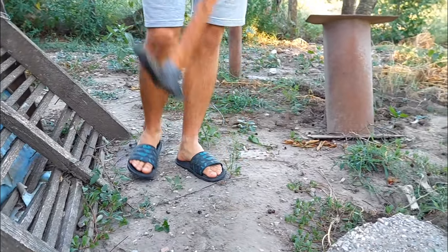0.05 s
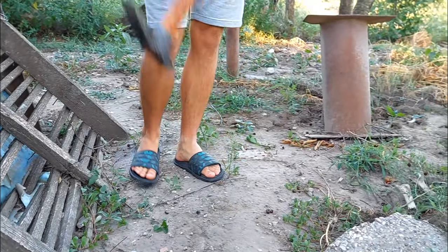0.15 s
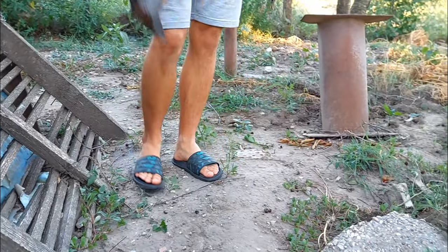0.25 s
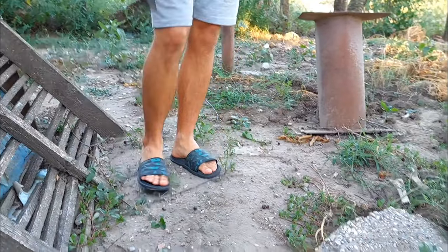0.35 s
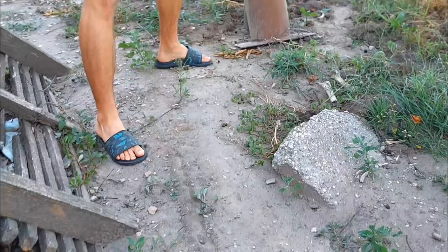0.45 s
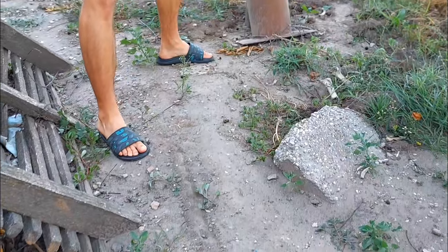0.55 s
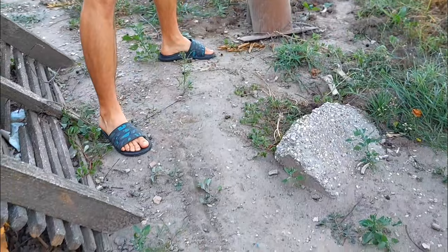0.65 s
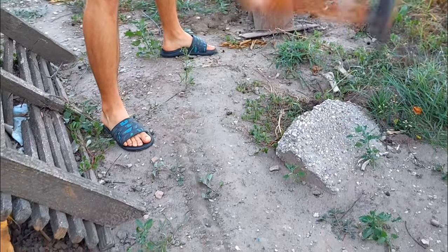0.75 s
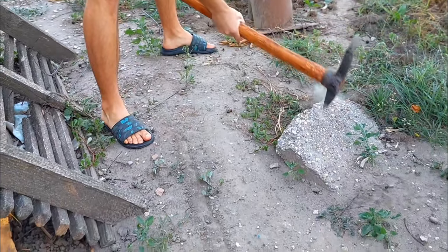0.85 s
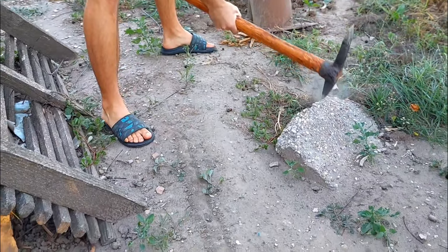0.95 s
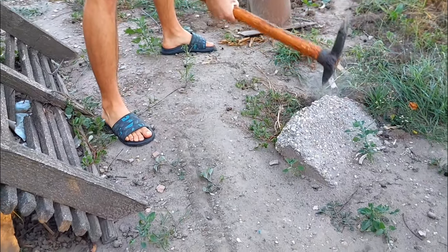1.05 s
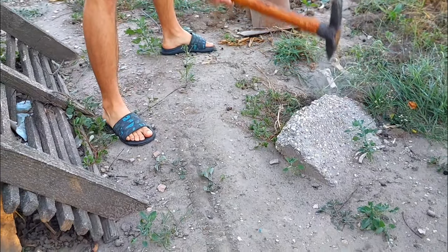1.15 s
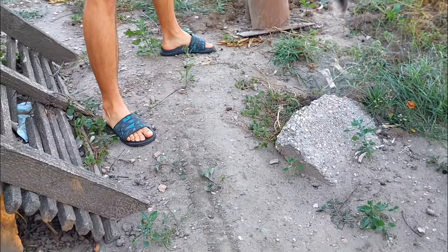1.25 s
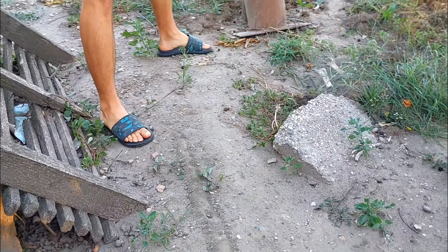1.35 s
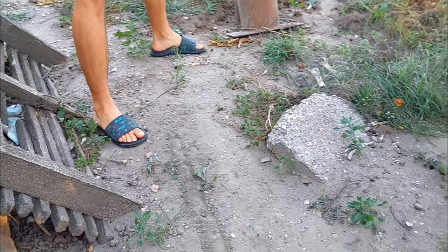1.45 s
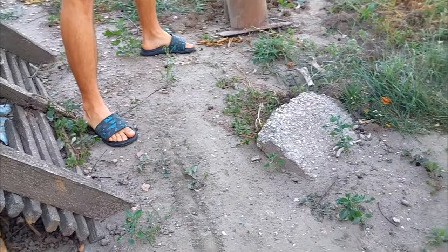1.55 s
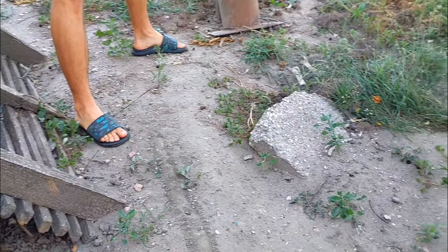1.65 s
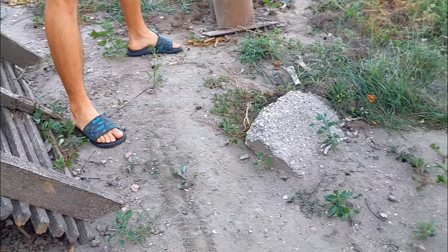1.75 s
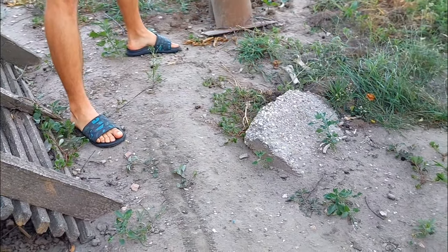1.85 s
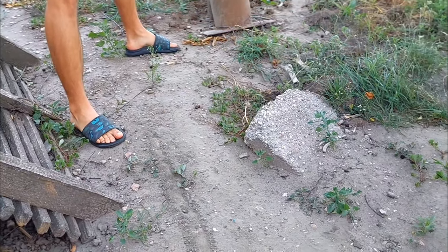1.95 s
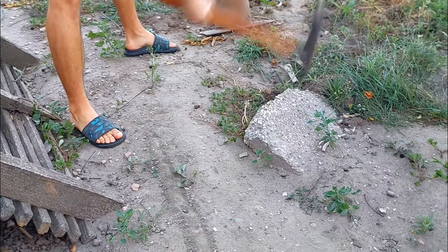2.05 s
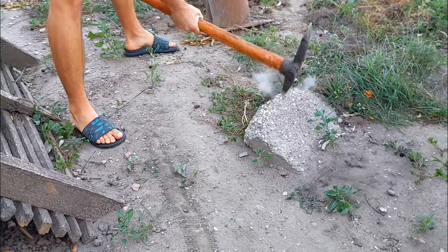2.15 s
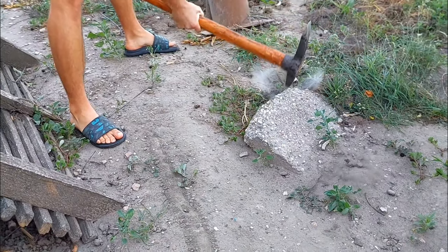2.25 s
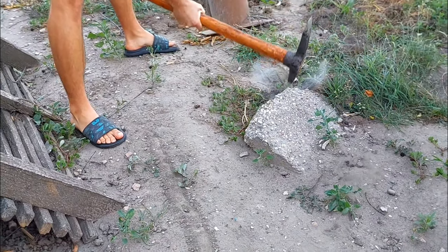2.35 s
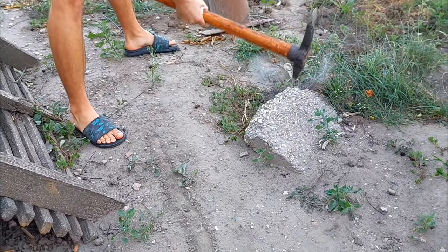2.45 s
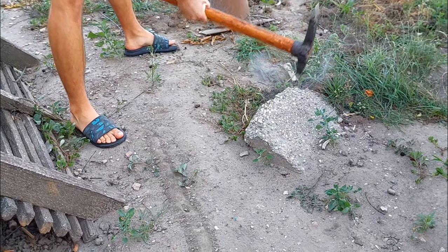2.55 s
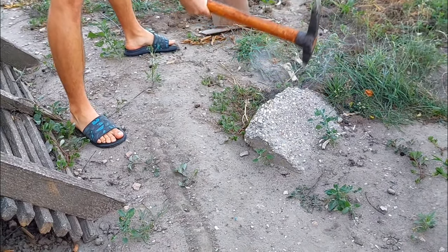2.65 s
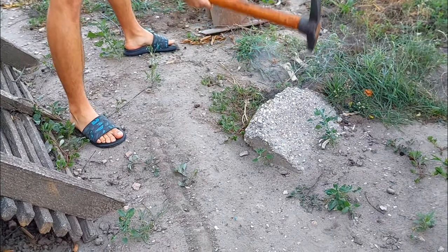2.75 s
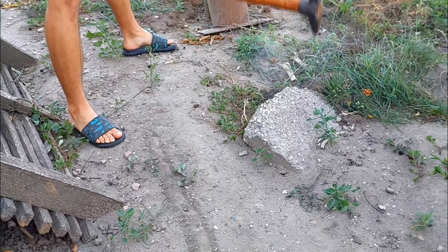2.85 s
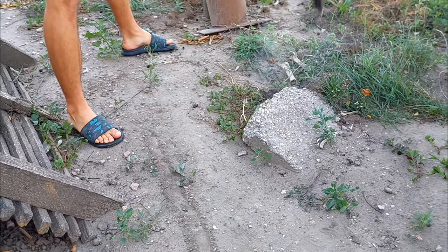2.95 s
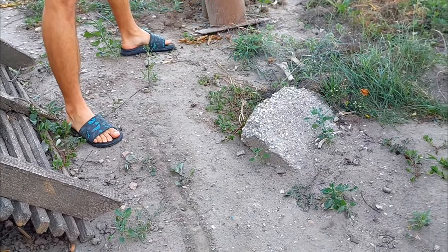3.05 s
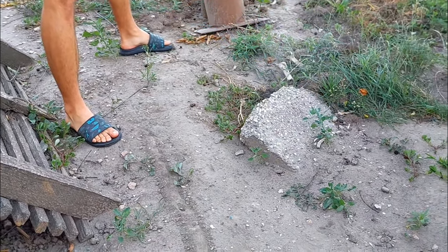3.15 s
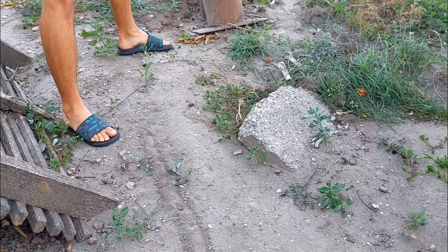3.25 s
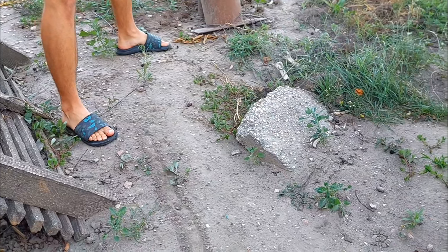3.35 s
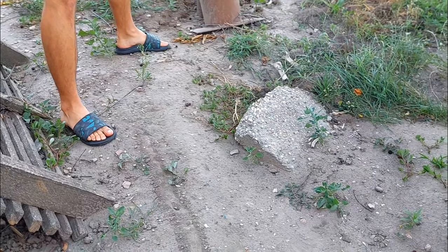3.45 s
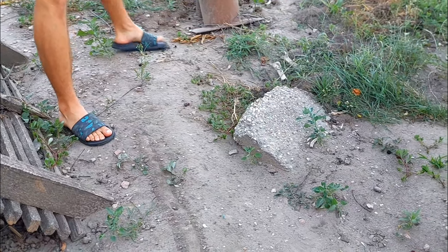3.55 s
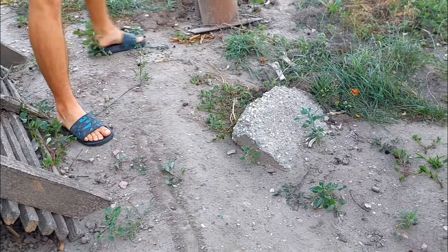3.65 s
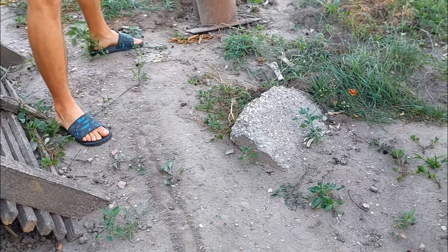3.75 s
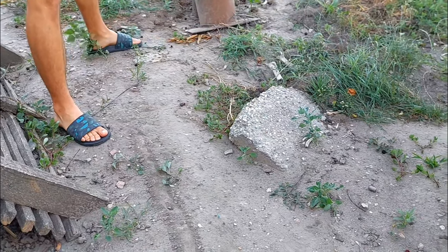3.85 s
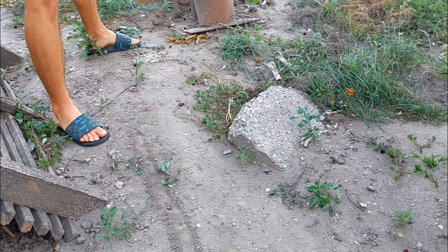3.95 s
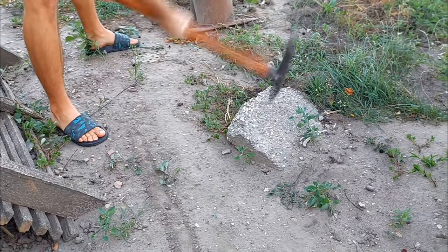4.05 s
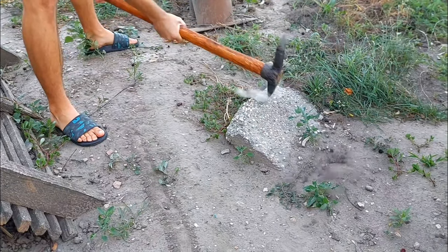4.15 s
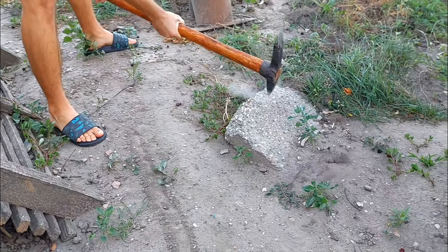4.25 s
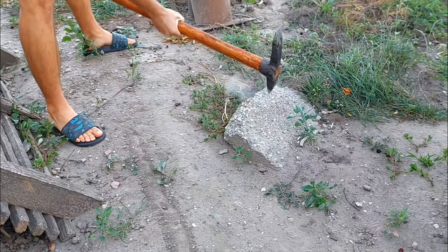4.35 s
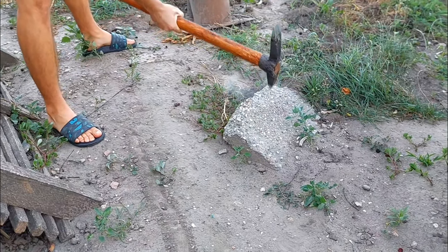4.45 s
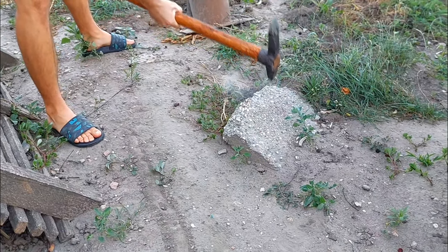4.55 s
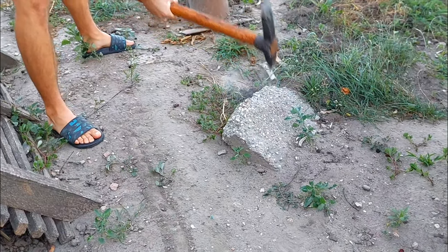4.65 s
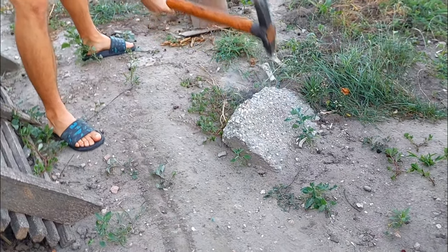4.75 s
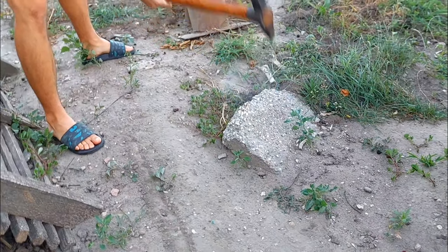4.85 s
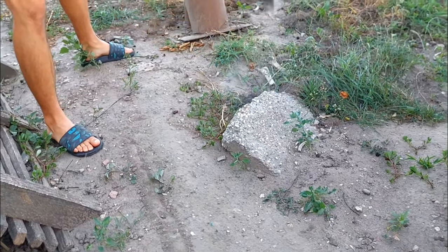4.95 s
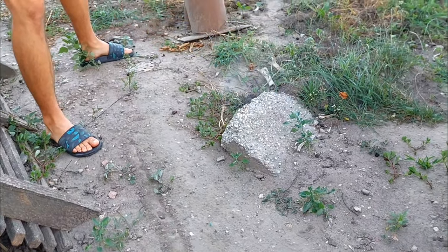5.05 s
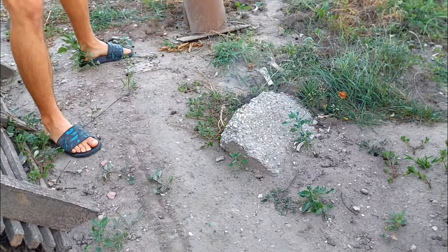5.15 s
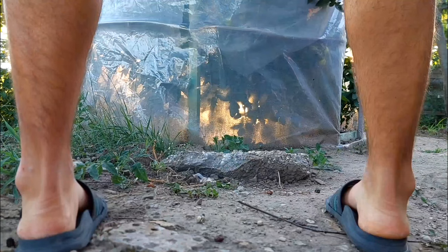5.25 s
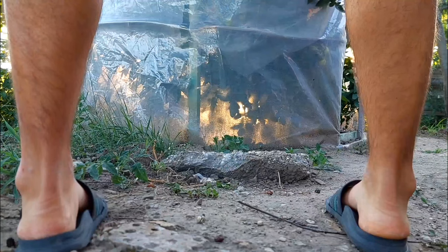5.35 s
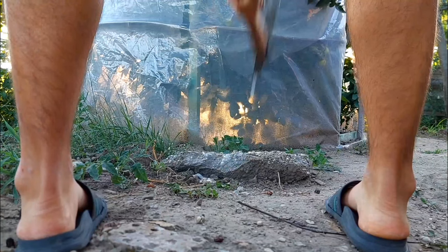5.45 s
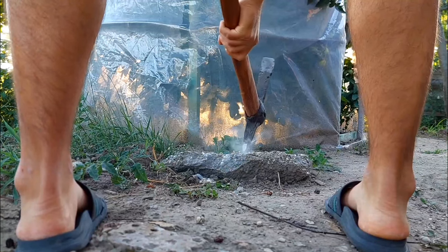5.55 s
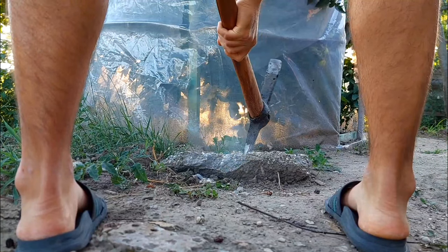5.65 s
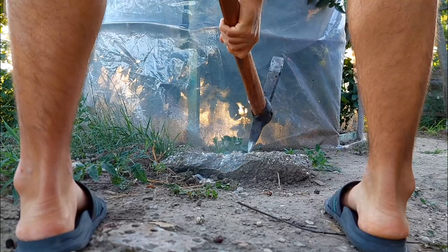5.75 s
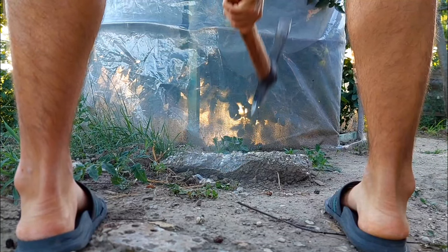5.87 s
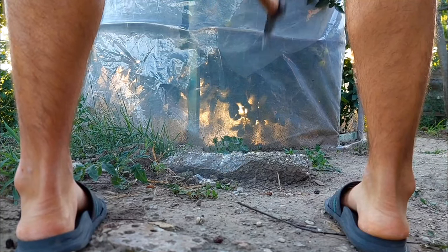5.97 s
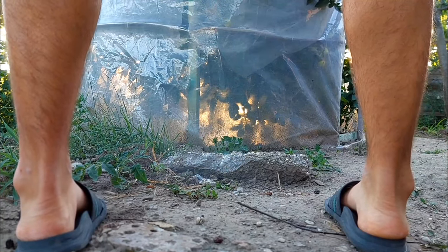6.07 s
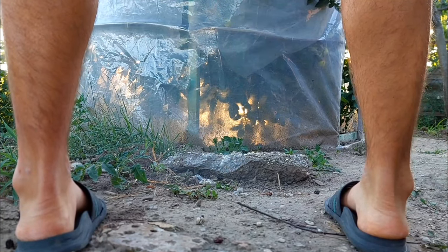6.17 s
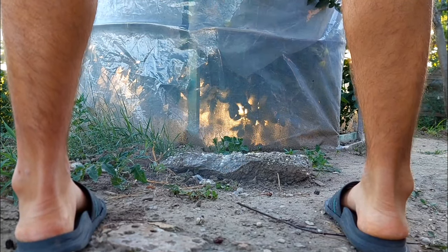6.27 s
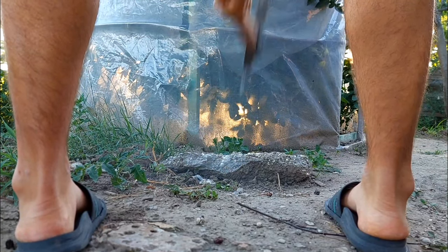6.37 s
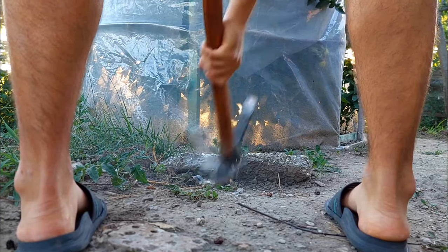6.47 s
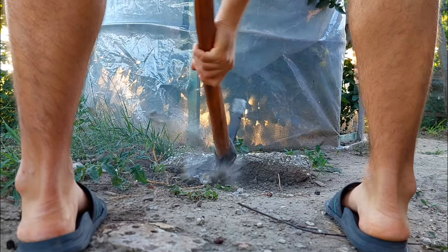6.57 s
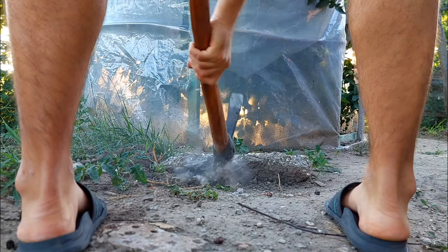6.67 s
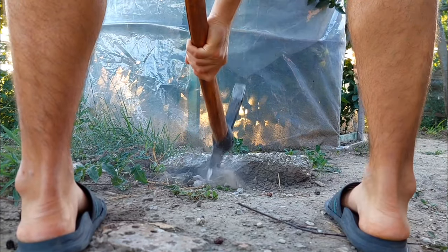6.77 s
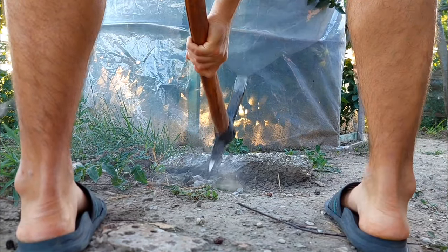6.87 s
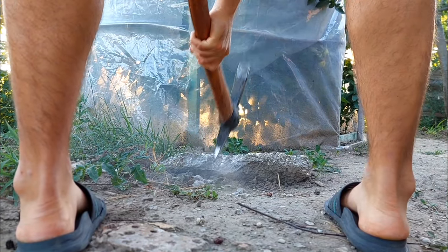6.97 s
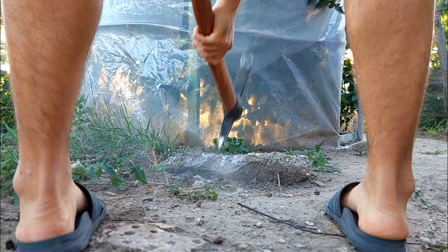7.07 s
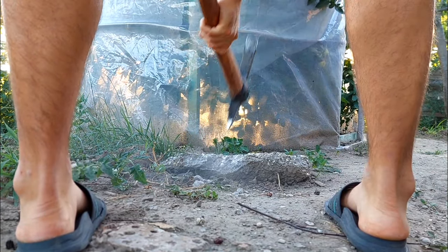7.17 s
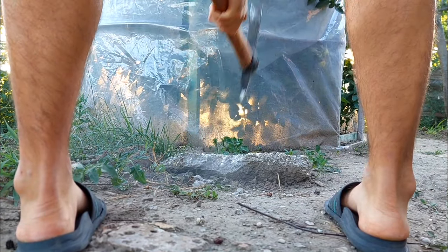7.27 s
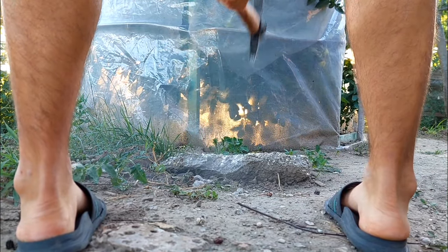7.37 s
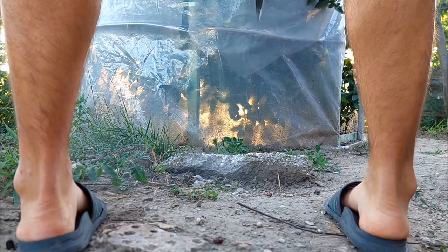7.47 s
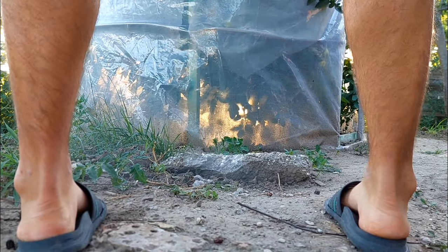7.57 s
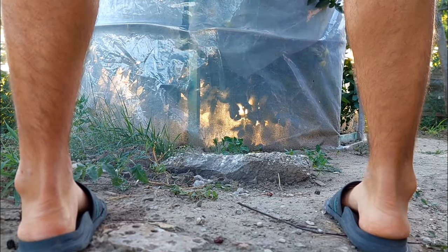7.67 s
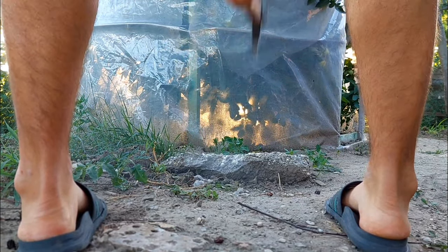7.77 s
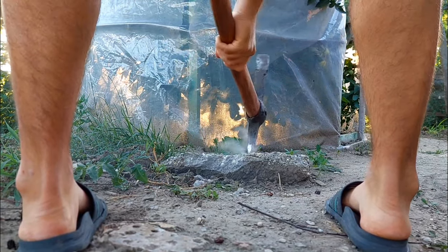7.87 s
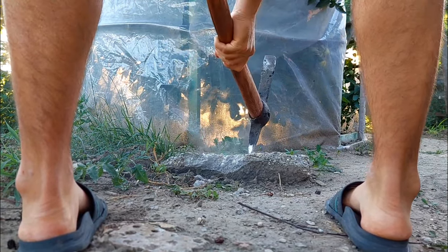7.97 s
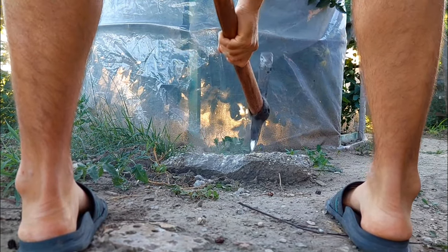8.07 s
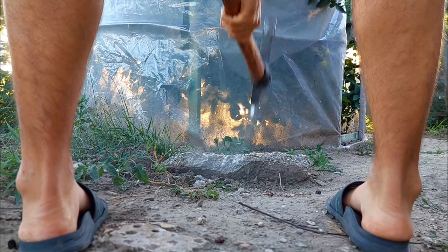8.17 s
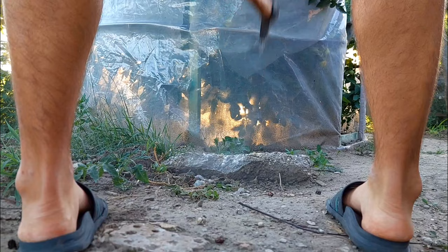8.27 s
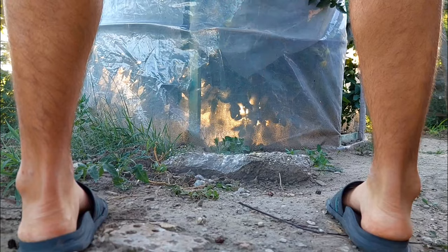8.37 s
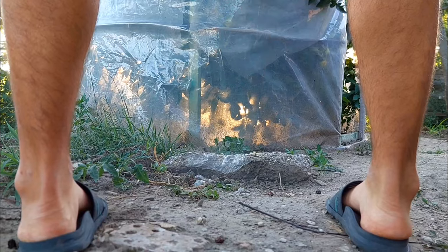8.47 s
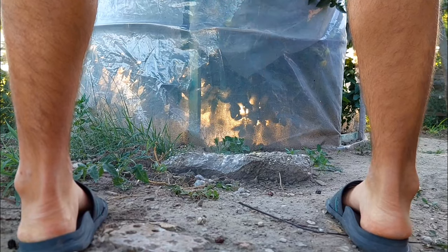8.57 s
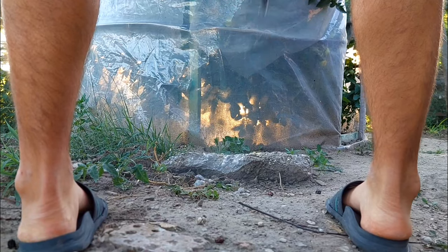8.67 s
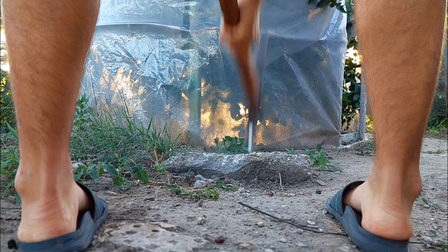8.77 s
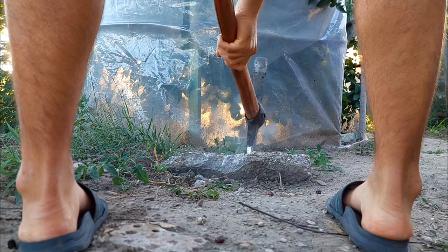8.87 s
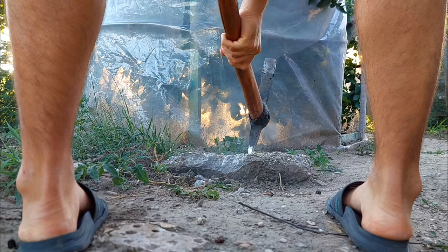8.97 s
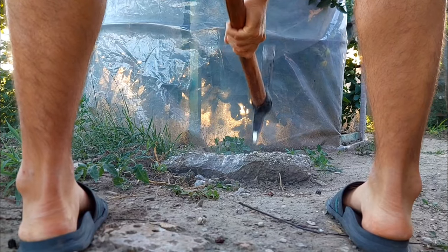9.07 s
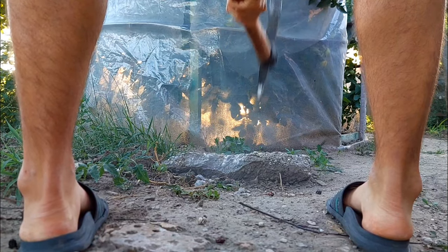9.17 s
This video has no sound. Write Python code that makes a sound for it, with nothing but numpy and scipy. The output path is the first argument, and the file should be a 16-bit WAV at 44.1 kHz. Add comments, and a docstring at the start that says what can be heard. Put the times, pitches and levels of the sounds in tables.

```python
"""A steel pickaxe strikes a lump of concrete in a yard, heard from the side, then from the ground behind
the digger. Point blows crush grit, thump the soil and ring the head lengthwise; one flat blow rings it
freely. Feet shuffle, chips patter, and the hand-held microphone rumbles. In slowed stretches the sound
repeats short pieces, so some blows stutter; twice it drops out briefly."""
import sys
import numpy as np
from scipy import signal
from scipy.fft import rfft, irfft, next_fast_len
from scipy.io import wavfile
from scipy.ndimage import uniform_filter1d

SR = 44100
rng = np.random.default_rng(int(sys.argv[2]) if len(sys.argv) > 2 else 0)


def generate_wav(signal):
    """Clip the signal to [-1, 1] and save it as 16-bit WAV at the path in sys.argv[1]."""
    frames = np.transpose(np.atleast_2d(signal))
    scaled = np.clip(frames, -1, 1) * 32767
    pcm = np.round(scaled).astype(np.int16)
    wavfile.write(sys.argv[1], SR, pcm)


N = 406602

# Point blows and rebounds. Each row: start in seconds, crush and steel in dB, steel tilt in dB per
# octave, block and thump in dB, thump pitch factor, grit in dB, grit t60 in seconds,
# left over right in dB.
BLOWS = [(0.909, -20, -19, -1, -16, -9, 0.97, -20, 0.13, 1.5),
         (2.2341, -5.5, -23, -3, -17, -8.5, 0.92, -32.5, 0.24, 2),
         (4.231, -14, -12, -4, -10.5, -8, 1.03, -39.5, 0.15, 3.5),
         (4.293, -36.5, -37, -7, -30, -28, 1.16, -46, .15, -3),
         (5.62, -14.5, -16, 2.5, -45, -5, 1.06, -39.5, 0.15, -0.1),
         (5.748, -50.5, -33, -3.5, -35.5, -27.5, 0.97, -64, 0.1379, -1),
         (6.5566, -7.5, -13.5, 5.5, -33, -12.5, 1.0, -39, 0.25, 0),
         (6.645, -25, -31.5, 4, -31, -30, 0.9, -34, 0.17, 1),
         (7.968, -9, -16, 2, -43, -5.5, 1.02, -32.5, 0.18, -2),
         (8.03, -56.5, -46.5, -15, -46, -35, 0.84, -67, .1, 6),
         (8.096, -70, -60, -1, -70, -50, 0.98, -66, 0.12, 3),
         (8.135, -70, -63, 2, -72, -48, 0.88, -64, 0.13, 1),
         (8.895, -16.5, -20, 7, -30, -4, 1.03, -27.5, 0.18, -1.5),
         (8.967, -36, -42, -3, -33, -34, 1.02, -52, .1, -0.5),
         (9.097, -66, -53.5, 3.5, -67, -43, 0.93, -56, .08, 3)]
# The bright hiss of rustles and cracks. Each row: frequency in Hz, density in dB.
RUSTLE_SPECTRUM = [(1500, -20), (3000, -9.5), (5000, -2.5), (9000, -4), (15000, -5), (17000, -3.5)]
# The microphone at the side, then on the ground behind. Each row: start in seconds, steady rumble,
# shuffle and rustle in dB, the chips' left over right in dB.
MIC_POSITIONS = [(0, -65.5, -81.5, -86, 12), (5.252, -75.5, -104, -100, 3)]


def gain_of(db):
    """Decibels to gain."""
    return 10 ** (np.asarray(db) / 20)


def replays():
    """Every jump back that repeats a piece of the sound, in order."""
    # Jumps that double a blow or chip. Each row: time in seconds, jump in ms, crossfade in ms.
    stutters = [(.027, 25.3, 6), (2.2365, 23.7, 4), (2.304, 60, 6), (2.382, 45.1, 8), (4.259, 37.4, 8),
                (4.335, 45.2, 8), (5.05, 42.5, 8), (5.134, 65.6, 8), (5.21, 42.6, 8), (6.584, 54.6, 24),
                (6.654, 54.5, 10), (6.733, 40.2, 8), (6.81, 42.9, 8), (7.137, 48, 12), (7.215, 31.5, 8)]
    # Stretches slowed by regular jumps. Each row: start and end in seconds, jump in ms.
    slowed = [(2.47, 3.0, 41.5), (4.416, 5.0, 49.5), (6.89, 7.1, 50)]
    hop_s, fade_ms = .0795, 8
    regular = [(s, ms, fade_ms) for start, end, ms in slowed for s in np.arange(start, end, hop_s)]
    return sorted(stutters + regular)


def yard_time(s):
    """Time in the yard for a time as heard: every jump so far is taken off."""
    at, jump_ms, _ = np.transpose(replays())
    return s - (np.asarray(s)[..., None] > at) @ jump_ms / 1000


def add(mix, s, sound, pan_db=0.):
    """Lays in a sound to be heard at s seconds; positive pan is to the left."""
    part = mix[:, round(yard_time(s) * SR):][:, :sound.shape[1]]
    part += sound[:, :part.shape[1]] * gain_of([[pan_db / 2], [-pan_db / 2]])


def noise(size, spectrum, band, same):
    """Two channels of coloured noise with correlation `same`, of rms 1 within the band in Hz."""
    padded = next_fast_len(size, True)
    left, other = rng.standard_normal((2, padded))
    right = same * left + np.sqrt(1 - same ** 2) * other
    hz, (points_hz, db) = np.fft.rfftfreq(padded, 1 / SR), np.transpose(spectrum)
    shape = gain_of(np.interp(np.log(hz + 1), np.log(points_hz), db))
    shape /= np.sqrt((shape[(hz > band[0]) & (hz < band[1])] ** 2).sum() / len(hz))
    return irfft(rfft([left, right]) * shape, padded)[:, :size]


def flicker(shape, spread_db, width):
    """A random gain, smoothed over `width` points."""
    return gain_of(spread_db * uniform_filter1d(rng.standard_normal(shape), width) * np.sqrt(width))


def burst(t, rise, t60):
    """Envelope with a soft start and an exponential fall."""
    return (1 - np.exp(-(t / rise) ** 2)) * gain_of(-60 * t / t60)


def swell(t, start, attack, hold, db, fall_db_per_s):
    """Power envelope: attack, hold, release."""
    rising_db = 20.5 * (start + attack - t) / attack
    falling_db = fall_db_per_s * (t - start - attack - hold)
    return gain_of(2 * (db - np.maximum(np.maximum(rising_db, falling_db), 0)))


def dirt_power(t, heard, at_side):
    """Power of soil, shuffle and rustle as feet and tool scuff the dirt and it settles after blows."""
    # Each row: start, attack and hold in seconds, shuffle and rustle in dB.
    scuffs = [(0, 0.004, 0.062, -74.5, -74), (0.144, 0.064, 0.41, -89, -72.5),
              (0.488, .015, 0.035, -58, -54.5), (0.731, 0.042, 0.013, -70, -67),
              (.8, .04, 0.059, -67.5, -85), (1.086, 0.094, .16, -65, -82.5),
              (1.405, 0.049, 0.084, -73, -78), (1.546, 0.029, 0.039, -74, -74.5),
              (1.66, 0.1, 0.13, -72, -74.5), (3.047, 0.0077, 0.02, -71, -64.5),
              (3.08, 0.043, 0.052, -71, -87.5), (3.4, 0.052, .05, -86, -78.5),
              (3.66, 0.12, 0.027, -57, -67), (3.97, 0.083, 0.048, -76.5, -91), (4.75, 0.21, 0.34, -67, -70),
              (5.92, 0.032, .05, -77, -74), (6.24, 0.071, 0.043, -84, -77), (6.74, .04, .33, -85, -75),
              (7.113, 0.0067, .13, -58, -55), (7.26, 0.015, 0.14, -56, -60),
              (7.449, .03, 0.15, -69.5, -70.5), (7.638, .03, .15, -77, -80.5),
              (8.45, .015, .02, -84.5, -68), (8.67, .015, .03, -100, -80), (9.09, 0.024, .02, -83, -76)]
    # Soil, dirt and dust, one set a position. Each row: dB over the thump, fall in dB a second.
    settling = [
        [(-26.5, 81), (-49, 104.5), (-64, 109.5)],
        [(-33, 90), (-59.5, 189.5), (-66, 170)],
    ]
    side, ground = np.array(MIC_POSITIONS)
    move_s = ground[0]
    power = np.zeros((3, len(t)))
    power[1:] = gain_of(2 * np.where(at_side, side[2:4, None], ground[2:4, None]))
    for s, _, _, _, _, thump_db, *_ in BLOWS:
        audible = at_side == (s < move_s)
        for layer, (db, fall) in enumerate(settling[int(s > move_s)]):
            power[layer] += swell(t, yard_time(s), 0.014, 0, thump_db + db, fall) * audible
    for s, attack, hold, *layers_db in scuffs:
        audible = at_side == (s < move_s)
        power[1:] += [swell(heard, s, attack, hold, db, 329.5) * audible for db in layers_db]
    return power


def grip_power(heard, at_side):
    """Power of the left and right rumble: a steady bed, and lumps as the hand shifts on the microphone."""
    # Each row: start, attack and hold in seconds, level in dB.
    grips = [(0.052, .05, 0.34, -39.5), (0.481, 0.032, 0.31, -36.5), (1.185, 0.054, 0.1, -45.5),
             (1.437, 0.047, .02, -55.5), (1.982, .05, 0.15, -61.5), (3.3, 0.17, .04, -44.5),
             (3.609, 0.035, 0.013, -53.5), (3.75, 0.047, .04, -58), (4.0, 0.083, 0.093, -53.5),
             (5.171, 0.027, .04, -42.5), (6.22, .08, 0.056, -55.5)]
    side, ground = MIC_POSITIONS
    steady = gain_of(2 * np.where(at_side, side[1], ground[1]))
    grip = sum(swell(heard, *row, fall_db_per_s=400.5) * (at_side == (row[0] < ground[0]))
               for row in grips)
    grip *= flicker(len(heard), spread_db=2.5, width=40) ** 2
    left_db = 18.5 * at_side  # at the side, the hand is nearer the left port
    ports = 2 / (1 + gain_of([-left_db, left_db]))
    return steady + grip * ports ** 2


def background():
    """Handling rumble, still air, shaking ground, gritty footwork and for a while a faint far hum."""
    # Noise colours. Each row: frequency in Hz, density in dB.
    rumble_spectrum = [(12, -46), (20, -20.5), (53, 3.5), (91, -5), (128, -5.5), (216, -18.5), (295, -23),
                       (475, -40.5), (700, -46.5), (910, -65.5), (1540, -120)]
    ground_spectrum = [(25, -18), (55, -6.5), (100, -0.5), (140, -7), (250, -26), (600, -54)]
    shuffle_spectrum = [(150, -7.5), (350, 0), (600, 1.5), (1300, 1), (2500, -3.5), (5000, -14),
                        (9000, -22)]
    air_spectrum = [(88, -41), (150, -12), (300, -2), (361, -10.5), (2000, -28.5), (2600, -60.5),
                    (4400, -120)]
    t = np.arange(N) / SR
    coarse = t[::32]
    heard = np.interp(coarse, np.maximum.accumulate(yard_time(coarse)), coarse)  # time as heard
    at_side = heard < MIC_POSITIONS[1][0]
    powers = [*grip_power(heard, at_side), *dirt_power(coarse, heard, at_side)]
    levels = np.array([np.interp(t, coarse, np.sqrt(power)) for power in powers])
    rumble, (soil, shuffle, rustle) = levels[:2], levels[2:]
    grains = flicker((2, N), spread_db=1.6, width=200)
    crackle = (rng.random((2, N)) < 120 / SR) * rng.exponential(0.69, (2, N))  # grit under the soles
    grains += signal.lfilter([1], [1, -np.exp(-1 / (0.0011 * SR))], crackle)
    return (rumble * noise(N, rumble_spectrum, (40, 300), same=0.36)
            + gain_of(-78.5) * noise(N, air_spectrum, (250, 900), same=0.16)
            + soil * noise(N, ground_spectrum, (40, 1200), same=.85)
            + shuffle * grains[0] * noise(N, shuffle_spectrum, (1100, 1700), same=0.17)
            + rustle * grains[1] * noise(N, RUSTLE_SPECTRUM, (9500, 15000), same=1.0)
            + far_hum(t, np.interp(t, coarse, heard)))


def chip(db, hz):
    """A pebble lands with a tick and a short rough ring; smaller, higher ones die sooner."""
    t = np.arange(3000) / SR
    colour = [(hz / 4, -30), (hz * .75, -6), (hz, 0), (hz * 1.35, -6), (hz * 2.5, -16), (hz * 8, -30)]
    t60 = 0.027 * (hz / 2000) ** -0.43
    return gain_of(db - 4.5) * noise(len(t), colour, (0, SR), same=0.54) * burst(t, 0.0018, t60)


def low_thump(db, hz):
    """A few low cycles: a knock on the microphone, or the thud of the flat blow."""
    t = np.arange(SR // 5) / SR
    return gain_of(db) * np.sin(2 * np.pi * hz * t) * burst(t, 0.0038, 0.091) * np.ones((2, 1))


def ring(force, modes, tilt_db=0.):
    """A short force rings damped modes, each a little detuned and out of step at the two ports."""
    t = np.arange(SR // 10) / SR
    detune, port_radians = 0.0079, 1.2
    body = np.zeros((2, len(t)))
    for hz, db, t60 in modes:
        shift, turn = rng.standard_normal(2)
        envelope = gain_of(db + tilt_db * np.log2(hz / 2000) - 60 * t / t60)
        port_phase = [[0], [port_radians * turn * min(hz / 1200, 1)]]
        body += envelope * np.sin(2 * np.pi * hz * (1 + detune * shift) * t + port_phase)
    unit_force = force / np.linalg.norm(force, axis=1).mean()
    return signal.fftconvolve(unit_force, body, axes=1)[:, :force.shape[1]]


def point_blow(crush_db, steel_db, tilt_db, block_db, thump_db, pitch, grit_db, grit_t60):
    """The point grinds in for a few ms; steel, block and soil ring; grit sprays after."""
    # The head compressed along its length and damped by the stone, then the concrete lump.
    # Each row: frequency in Hz, level in dB, t60 in seconds.
    steel_modes = [(1880, .1, .025), (2020, -.5, .016), (3700, .5, .022), (5600, -17, .012),
                   (7100, -6, .02), (9000, -13, .012), (10900, -16, .01), (12600, -15, .01),
                   (14200, -14, .01)]
    block_modes = [(480, -9.5, 0.0066), (767, 3.5, 0.0083), (1250, -17.5, 0.059), (2810, -2, 0.0069),
                   (4360, -9, .02)]
    # Breaking stone. Each row: frequency in Hz, density in dB.
    crush_spectrum = [(240, -20), (400, -6.5), (1270, -14.5), (1500, -24), (1990, -12.5), (5550, -19.5),
                      (14100, -22), (15700, -36.5), (16500, -55.5)]
    t = np.arange(SR // 2) / SR
    grains = flicker(len(t), spread_db=3.7, width=60)
    grinding = burst(t, .0035, .018) + .05 * grains * burst(t, .01, .15)  # loose grit rattles the steel
    force = noise(len(t), [(200, -20), (1000, 0), (16500, 0)], (0, SR), same=.55) * grinding
    force += 4.0 * np.exp(-((t - .003) / .00003) ** 2)  # the point stops dead: one hard jolt
    crush = gain_of(crush_db) * burst(t, 0.0054, 0.037)
    grit = gain_of(grit_db) * grains * burst(t, 0.01, grit_t60)
    return ((crush + grit) * noise(len(t), crush_spectrum, (400, 16000), same=0.48)
            + gain_of(thump_db) * soil_thump(t, pitch)
            + gain_of(steel_db) * ring(force, steel_modes, tilt_db)
            + gain_of(block_db) * ring(force, block_modes))


def soil_thump(t, pitch):
    """The soil yields a moment late, swings two or three times, stops short and settles."""
    # The ground's swing. Each row: frequency in Hz at pitch 1, level in dB.
    soil_modes = [(125, -4), (230, -11), (330, -18), (520, -19.5)]
    # The ground settling. Each row: frequency in Hz, density in dB.
    tail_spectrum = [(40, -25), (100, 3), (160, -5), (300, -12.5), (600, -22.5), (1200, -50.5)]
    late = np.maximum(t - .0012, 0)
    swing = sum(gain_of(db) * np.sin(2 * np.pi * hz * pitch * late) for hz, db in soil_modes)
    envelope = (1 - np.exp(-late / .003)) * np.exp(-(late * pitch / .019) ** 4)
    tail = noise(len(t), tail_spectrum, (40, 1200), same=.9) * burst(t, 0.0051, .3)
    return swing * envelope + gain_of(-17.5) * tail


def chip_spray(thump_db):
    """Small chips thrown up by a blow patter down, the later ones fainter."""
    count, wait_s, low_hz, high_hz = 8, .06, 1400, 5000
    out = np.zeros((2, SR))
    for wait, size, pitch, side in rng.random((count, 4)):
        late = -wait_s * np.log(1 - .99 * wait)
        hz = low_hz * (high_hz / low_hz) ** pitch
        db = thump_db - 43.5 - 4.5 * np.log(size + 0.056) - 60 * late
        tick = chip(db, hz) * gain_of([[10 * side - 5], [5 - 10 * side]])
        out[:, round((late + .02) * SR):][:, :tick.shape[1]] += tick
    return out


def far_hum(t, heard):
    """A faint, wavering tone a long way off."""
    start_s, stop_s, hz, db = 2.65, 4.9, 1245, -79
    waver = 2.7 * np.sin(2 * np.pi * 3.2 * t)
    return gain_of(db) * np.sin(2 * np.pi * hz * t + waver) * (heard > start_s) * (heard < stop_s)


def ringing_strike(ring_db, free, crack_db, tilt_db):
    """A bright crack, then the free head's bending modes, dying ever faster as the grip tightens."""
    # The free head. Each row: frequency in Hz, left and right in dB, t60 in seconds.
    bending_modes = [(783, -43, -48, .33), (982, -45, -33, 1.47), (1371, -49, -42, .25),
                     (1841, -28, -31, .75), (2047, -33, -36, .85), (2186, -25, -31, .6),
                     (3035, -24, -27, .61), (3309, -42, -37, .3), (3889, -34, -39, .28),
                     (4343, -27, -26, .35), (4798, -32, -41, .2), (5183, -31, -35, .22),
                     (5650, -31, -38, .33), (6566, -23, -29, .25), (7080, -29, -30, .14),
                     (7385, -26, -28, .12), (7930, -28, -40, .18), (8315, -27, -39, .18),
                     (10870, -34, -36, .12)]
    t = np.arange(round(1.4 * free * SR) + SR // 4) / SR
    hz, *sides_db, t60 = np.transpose(bending_modes)
    envelopes = gain_of(tilt_db * np.log2(hz / 2000) - 60 * (t[:, None] / (t60 * free)) ** 1.5)
    waves = [np.sin(2 * np.pi * hz * (t[:, None] - late)) for late in (0, .00024)]  # right port is further
    ringing = np.array([(envelopes * wave) @ gain_of(db) for wave, db in zip(waves, sides_db)])
    snap = burst(t, 0.0024788, 0.15) + 0.1 * burst(t, 0.008711, 0.1)
    crack = noise(len(t), RUSTLE_SPECTRUM, (2000, 16000), same=0.43) * snap
    return gain_of(ring_db) * ringing * burst(t, 0.0024, np.inf) + gain_of(crack_db) * crack


def edge_graze(db, hz, t60):
    """The edge drags over the stone and sings a rough, narrow tone."""
    t = np.arange(SR // 2) / SR
    line = [(hz * .9, -40), (hz * .975, -8), (hz, 0), (hz * 1.025, -8), (hz * 1.1, -40)]
    return gain_of(db) * noise(len(t), line, (0, SR), same=.7) * burst(t, .002, t60)


def scene():
    """Everything that reaches the microphone, in yard time."""
    # Ringing strikes of the head: flat knocks, and the clink that starts the graze. Each row: start in
    # seconds, ring in dB, share of the free ring time, crack in dB, ring tilt in dB per octave.
    strikes = [(7.116, -24.5, 0.2, -41, 5.5), (7.258, 2, 0.98, -17, 1.5), (7.674, -44, 0.2, -50, 13),
               (8.226, -69.5, 0.46, -75, 9)]
    # Low thumps: knocks on the microphone, and the thud of the flat blow.
    # Each row: start in seconds, level in dB, pitch in Hz, left over right in dB.
    thumps = [(0.095, -30, 103, 31.5), (0.297, -31, 63.5, 28), (0.327, -31, 100, 28),
              (0.545, -27.5, 69, 34), (0.614, -32, 85, 34), (0.696, -27, 48.9, 27),
              (0.713, -23.5, 125.4, 29.5), (0.749, -43.5, 119, 34), (1.215, -35.5, 96, 21),
              (3.329, -51.5, 87, 38), (3.434, -46, 93.4, 42.5), (3.615, -50, 69, 28),
              (4.066, -40.5, 100.5, 23.5), (5.185, -48, 75.4, 7), (6.252, -40, 94, -2),
              (7.252, -23, 71, 19)]
    # Larger chips landing. Each row: start in seconds, level in dB, centre in Hz.
    chips = [(.004, -45, 1850), (.5055, -25, 5770), (.56, -33, 12000), (.889, -49, 2000), (1.18, -55, 4000),
             (1.277, -47, 2424), (1.426, -49, 2230), (1.961, -50, 2300), (2.0203, -46.5, 9730),
             (2.0344, -52, 1890), (3.0527, -45.5, 2780), (3.2894, -53, 1400), (3.679, -45, 1956),
             (3.9937, -56.5, 4380), (4.0318, -53, 4480), (4.648, -52.5, 1940), (4.781, -49.5, 2100),
             (4.808, -49.5, 2500), (4.953, -49.5, 1990), (5.027, -42, 6000), (5.108, -43.5, 1300),
             (5.1276, -44, 5400), (5.9509, -41.5, 5470), (6.0128, -49, 11000), (6.1744, -51.5, 7788),
             (6.4998, -47.5, 11000), (6.779, -28, 9800), (7.362, -25, 4000), (7.398, -33, 9600),
             (7.4865, -38, 4700), (8.0755, -41.5, 6100), (9.1444, -50.5, 7760)]
    mix = background()
    for s, *row in strikes:
        add(mix, s, ringing_strike(*row))
    for s, *row, pan_db in BLOWS:
        add(mix, s, point_blow(*row), pan_db)
    add(mix, 7.119, edge_graze(db=-37, hz=2400, t60=.33), pan_db=7)
    for s, db, hz, pan_db in thumps:
        add(mix, s, low_thump(db, hz), pan_db)
    side, ground = MIC_POSITIONS
    for s, db, hz in chips:
        add(mix, s, chip(db, hz), pan_db=ground[-1] if s > ground[0] else side[-1])
    for s, _, _, _, _, thump_db, *_ in BLOWS:
        add(mix, s, chip_spray(thump_db))
    return mix


def record(dry):
    """Crossfaded jumps back, drop-outs, the small microphone's bass loss, soft overload, treble cut."""
    # Drop-outs. Each row: start and end in seconds.
    gaps = [(0.445, 0.4885), (1.508, 1.523)]
    t, out, back = np.arange(N) / SR, dry.copy(), 0
    for s, jump_ms, fade_ms in replays():
        back += round(jump_ms * SR / 1000)
        start, size = round((s - fade_ms / 2000) * SR), round(fade_ms * SR / 1000)
        old, fade = out[:, start:start + size].copy(), np.arange(size) / size
        out[:, start:] = np.pad(dry, ((0, 0), (back, 0)))[:, start:N]
        out[:, start:start + size] = old * (1 - fade) + out[:, start:start + size] * fade
    for start, stop in gaps:
        out *= np.clip(np.maximum(start - t, t - stop) / 0.001, 0, 1)
    low_hz, high_hz = 55, 16200
    out = signal.sosfilt(signal.butter(2, low_hz, "high", fs=SR, output="sos"), out)
    out = 1.021 * np.tanh(out / 0.88)
    lowpass = signal.firwin(511, high_hz, window=("kaiser", 9), fs=SR)
    return signal.oaconvolve(out, lowpass[None], "same", axes=1)


dry = scene()
out = record(dry)
generate_wav(out)
```